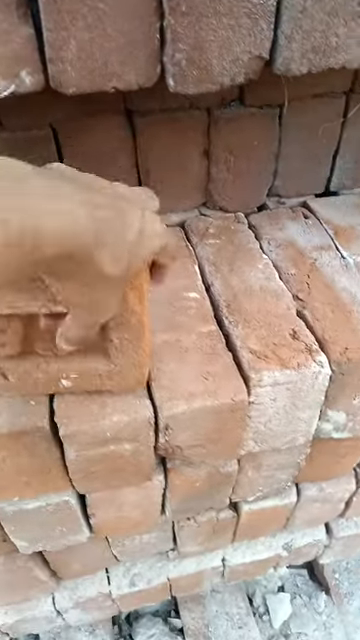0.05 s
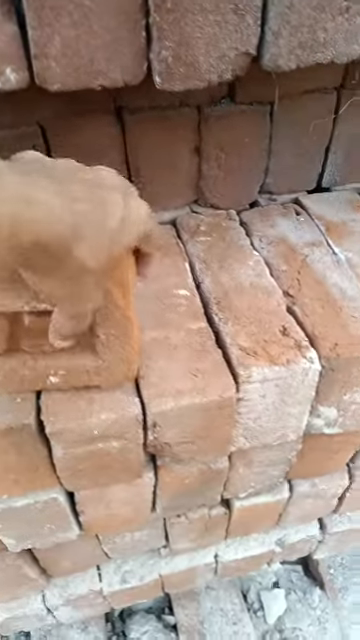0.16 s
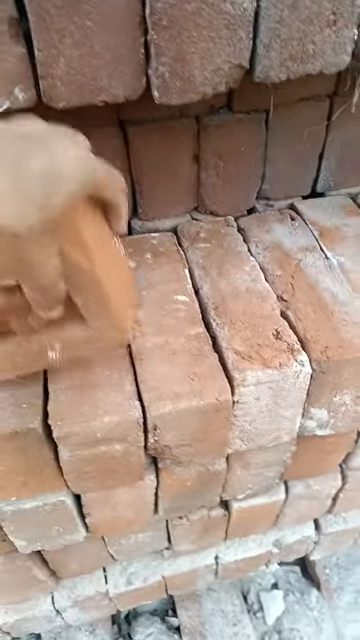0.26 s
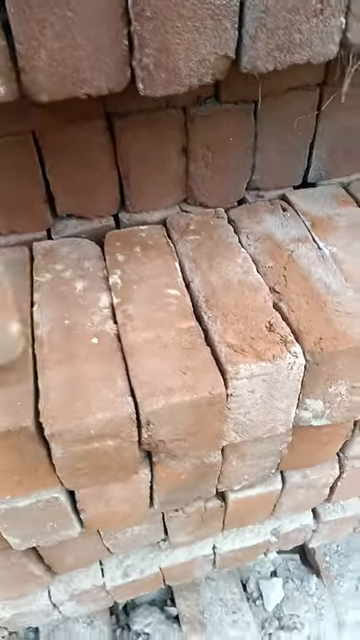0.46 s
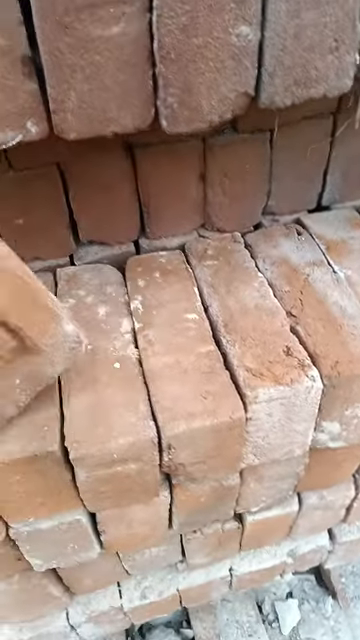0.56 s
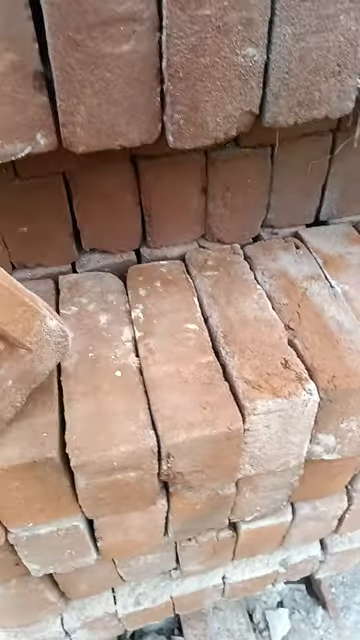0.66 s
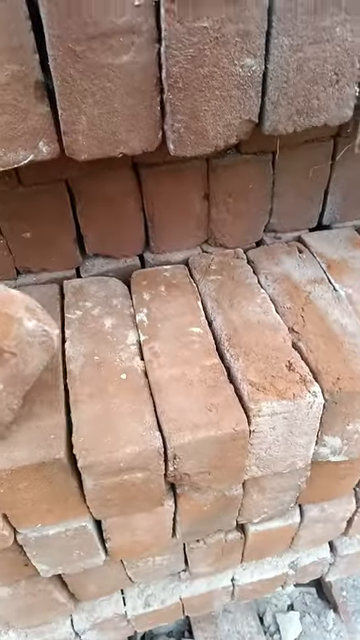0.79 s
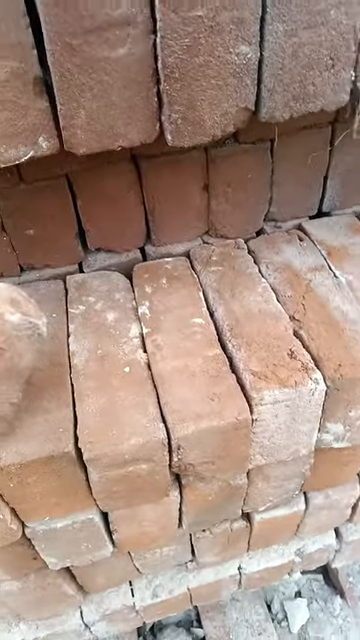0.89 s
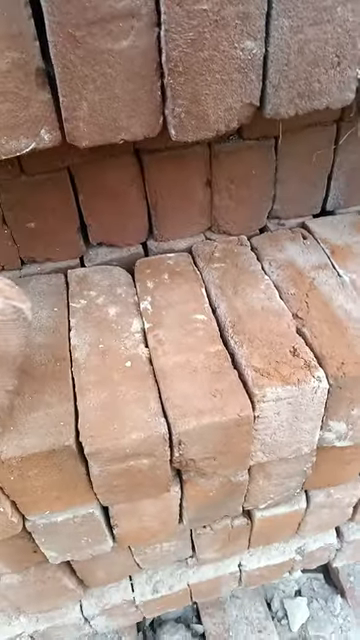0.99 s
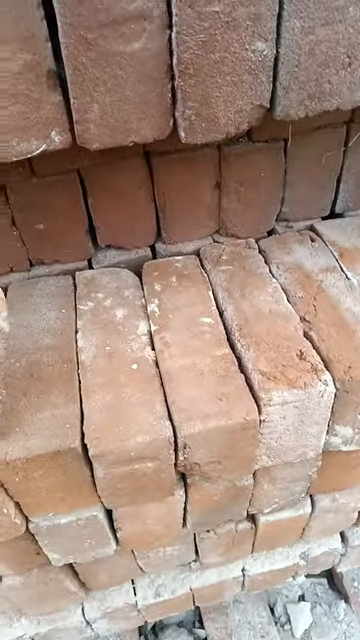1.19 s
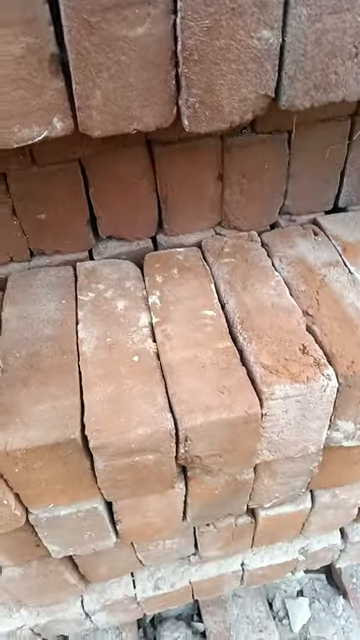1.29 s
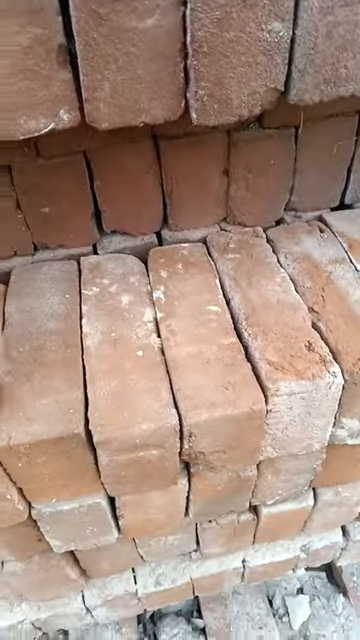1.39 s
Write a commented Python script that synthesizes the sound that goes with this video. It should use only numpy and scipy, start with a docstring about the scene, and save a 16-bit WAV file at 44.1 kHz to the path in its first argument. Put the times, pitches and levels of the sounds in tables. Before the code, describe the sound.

Gritty scraping and clinking knocks of a brick being slid, set down and nudged into place.

```python
"""A clay brick is dragged off a stack, knocks its neighbours, lands with a low thud and is nudged home.
Sliding friction breaks grit into a train of clicks that excites the brick's normal modes, and
stick-slip motion adds thin squeaks. Each impact rings the stack and crushes a little grit.
Brick piles close by return a short echo over a very quiet outdoor background."""
import sys
import numpy as np
from scipy import signal
from scipy.fft import rfft, irfft
from scipy.io import wavfile

SR = 44100
rng = np.random.default_rng(int(sys.argv[2]) if len(sys.argv) > 2 else 0)


def to_wav(s):
    """Save 16-bit WAV."""
    ch = np.atleast_2d(s).T  # columns
    pcm = np.round(np.clip(ch, -1, 1) * 32767)  # PCM
    wavfile.write(sys.argv[1], SR, pcm.astype(np.int16))


N = 63945
T = np.arange(N) / SR
JUDDER_HZ, JUDDER_DB = 260, 2.5  # rate and depth of the stick-slip flutter

# The drag across the stack. Each row: time in seconds, level in dB, treble gain in dB.
DRAG = [(0.09, -82, -29), (0.122, -39.5, -6), (0.16, -49, -23.5), (0.25, -25, -8.5), (0.282, -31, -1.5),
        (0.302, -22, 3.5), (0.346, -26, -1.5), (0.362, -15.5, 2.5), (0.382, -45, -16.5), (0.392, -30, 12.5),
        (0.408, -50, -22.5), (0.47, -50, -22.5), (0.53, -53.5, -16.5)]
# The brick catching on a neighbour before it lands. Each row: time in seconds, level in dB.
CATCH = [(0.529, -50), (0.535, -26), (0.541, -32), (0.545, -22.5), (0.548, -28), (0.552, -16.5),
         (0.559, -25), (0.566, -37), (0.58, -52)]
# The nudging into place. Each row: time in seconds, level in dB.
NUDGE = [(0.61, -38.5), (0.635, -38.5), (0.672, -44.5), (0.70, -40), (0.732, -57.5), (0.745, -40),
         (0.776, -47), (0.83, -55.5), (0.856, -46), (0.89, -46), (0.93, -57.5), (0.966, -71),
         (1.022, -44.5), (1.078, -56.5), (1.11, -31), (1.14, -47.5), (1.174, -31.5), (1.205, -44),
         (1.262, -49), (1.331, -50), (1.354, -29.5), (1.38, -45), (1.428, -45.5), (1.434, -50),
         (1.45, -32.5)]
# Modes of the brick, dragged and seated. Each row: frequency in Hz, relative level in dB, T60 in seconds.
DRAG_MODES = [(925, -8, .13), (1210, -8, .1), (1660, -7, .07), (2040, -6, .08), (2288, -2, .08),
              (2978, 0, .07), (3255, -2, .06), (3335, -6, .06), (3638, -1, .07), (3790, -4, .05),
              (3988, -1, .065), (4450, -5, .04), (5060, -5, .03), (5650, -4, .03), (5930, -2, .045),
              (6030, -3, .045), (6685, -5, .04), (6970, -2, .05), (7385, -1, .06), (8776, -4, .06)]
SEATED_MODES = [(930, -15, .06), (1240, -13, .06), (1740, -11, .08), (2012, 0, .15), (2078, -3, .11),
                (2305, -10, .09), (3118, -6, .05), (3335, -8, .05), (3680, -6, .04), (3980, -10, .03),
                (4450, -10, .03), (4850, -11, .04), (5730, -11, .06), (6330, -12, .04), (6590, -14, .04),
                (6980, -13, .04)]
# Spectrum of crunching grit. Each row: frequency in Hz, relative level in dB.
CRUNCH_SPECTRUM = [(1000, -15.5), (4500, -3.5), (6500, 5.5), (13000, -13), (15500, -17)]


def undb(db):
    """Amplitude ratio of a level in decibels."""
    return 10 ** (np.asarray(db) / 20)


def unit(x):
    """Normalisation to an rms of 1."""
    return x / np.sqrt(np.mean(x ** 2))


def curve(table, column=1):
    """Linear interpolation of a table column over time."""
    rows = np.array(table)
    return np.interp(T, rows[:, 0], rows[:, column])


def stroke(table):
    """Amplitude envelope of a movement, zero before and after it."""
    return undb(curve(table)) * (T >= table[0][0]) * (T <= table[-1][0])


def wander(rate):
    """Random modulation: Gaussian values, rate per second, joined by straight lines."""
    return np.interp(T * rate, np.arange(N // 10), rng.standard_normal(N // 10))


def tap(start):
    """An ideal impact: a unit impulse."""
    return signal.unit_impulse(N, int(start * SR))


def burst(start, decay, rise=.0007):
    """Transient envelope: exponential rise and decay, with time constants in seconds."""
    age = np.maximum(T - start, 0)
    return (1 - np.exp(-age / rise)) * np.exp(-age / decay)


def soften(x, hz, order=2):
    """Butterworth low-pass filtering."""
    return signal.sosfilt(signal.butter(order, hz, fs=SR, output="sos"), x)


def through(x, response):
    """Convolution with an impulse response scaled to unit energy."""
    return signal.fftconvolve(x, response / np.sqrt(np.sum(response ** 2)))[:N]


def colour(x, spectrum, size=4096):
    """Minimum-phase filtering to the shape of a spectrum."""
    hz, db = np.array(spectrum).T
    bin_hz = np.arange(size // 2 + 1) * SR / size
    log_gain = np.interp(np.log(bin_hz + 1), np.log(hz), np.log(undb(db)))
    cepstrum = irfft(log_gain)[:size // 2]
    cepstrum[1:] *= 2  # folding makes the response causal
    return through(x, irfft(np.exp(rfft(cepstrum, size))))


def ring(x, modes):
    """Modal superposition: x excites damped sinusoids of alternating sign, weighted by energy."""
    t = T[:N // 3]
    response = np.zeros_like(t)
    for k, (hz, db, t60) in enumerate(modes):
        amplitude = (-1) ** k * undb(db) / np.sqrt(t60)
        response += amplitude * np.exp(-np.log(1000) * t / t60) * np.sin(2 * np.pi * hz * t)
    return through(x, response)


def rubbed(x, modes):
    """Forced vibration under a moving contact: each mode swells, fades and detunes independently."""
    shift_hz, swell_db, detune = 45, 2, .004
    out, energy = np.zeros(N), 0
    for hz, db, t60 in modes:
        pole = np.exp(-np.log(1000) / (t60 * SR))
        pitch = hz * (1 + detune * wander(shift_hz))
        phasor = np.exp(2j * np.pi * np.cumsum(pitch) / SR)
        force = x * undb(swell_db * wander(shift_hz))
        swing = signal.lfilter([1], [1, -pole], force / phasor) * phasor
        out += undb(db) * np.sqrt(2 * (1 - pole ** 2)) * swing.imag
        out = -out  # successive modes alternate in sign
        energy += undb(db) ** 2
    return out / np.sqrt(energy)


def grit():
    """Shot noise of breaking grains: dense clicks, mostly small, modulated by stick and slip."""
    grains_per_s, spread_db = 5000, 2.7
    hit = rng.random(N) < grains_per_s / SR
    size = undb(spread_db * np.minimum(rng.exponential(size=N), 4))
    sign = rng.choice([-1, 1], N)
    return unit(hit * size * sign * undb(JUDDER_DB * wander(JUDDER_HZ)))


def air():
    """Stationary filtered noise: the faint outdoor background."""
    # Spectrum of the background. Each row: frequency in Hz, relative level in dB.
    spectrum = [(30, -12.5), (300, -13.5), (600, -3), (750, 0.5), (1200, -3.5), (2100, 0), (6000, -14.5),
                (12000, -19.5), (15000, -32)]
    return undb(-76) * colour(rng.standard_normal(N), spectrum)


def echo(x):
    """Scattering from the surrounding piles returns a short, dull tail."""
    delay_s, t60_s, cutoff_hz = 0.01, 0.15, 4500
    scatter = soften(rng.standard_normal(N), cutoff_hz, order=1)
    return undb(-22) * through(x, scatter * burst(delay_s, t60_s / np.log(1000)))


def rumble():
    """Low-frequency random vibration of the stack as the brick is worked in."""
    # Strength of the rumble. Each row: time in seconds, level in dB.
    levels = [(0.0, -84), (0.1, -84), (0.2, -70), (0.5, -73), (0.68, -61), (0.83, -73), (0.9, -66),
              (0.97, -81), (1.15, -71), (1.26, -65), (1.31, -77), (1.45, -73)]
    # Its spectrum. Each row: frequency in Hz, relative level in dB.
    spectrum = [(25, -27), (60, -10), (120, -1), (200, -10), (500, -10), (900, -15.5), (2000, -50.5)]
    return colour(rng.standard_normal(N), spectrum) * undb(curve(levels))


def crumbs():
    """Brittle fracture: single larger grains snap under the brick while it moves."""
    crumbs_per_s, spread_db, decay_s = 90, 4, .0004
    hit = rng.random(N) < crumbs_per_s / SR
    snaps = unit(hit * undb(spread_db * np.clip(rng.standard_normal(N), -2, 2)))
    chip = rng.standard_normal(N) * np.exp(-T / decay_s)
    dulling = undb(np.minimum(curve(DRAG, column=2), 0))
    effort = stroke(DRAG) * dulling + stroke(CATCH) + stroke(NUDGE) / 2
    return undb(-9) * colour(through(snaps * effort, chip), CRUNCH_SPECTRUM)


def squeaks():
    """Stick-slip oscillation: narrow, unsteady tones that swell and fade."""
    # Squeaks. Each row: start and length in seconds, first and last frequency in Hz, level in dB.
    tones = [(0.109, 0.086, 1350, 1275, -46), (0.159, 0.03, 2560, 2540, -43.5),
             (0.19, 0.067, 2325, 2196, -35.5), (0.225, 0.022, 3310, 3340, -29.5),
             (0.458, 0.08, 1185, 1255, -45), (0.964, 0.51, 826, 745, -61.5),
             (1.094, 0.147, 2020, 2008, -33)]
    out = np.zeros(N)
    for start, length, first_hz, last_hz, db in tones:
        along = np.clip((T - start) / length, 0, 1)
        waver = 1 + 0.015 * unit(soften(rng.standard_normal(N), hz=80))
        pitch = (first_hz + (last_hz - first_hz) * along) * waver
        flutter = undb(JUDDER_DB * wander(JUDDER_HZ))
        swell = 2 * np.sqrt(along * (1 - along))
        out += undb(db) * flutter * swell * np.sin(2 * np.pi * np.cumsum(pitch) / SR)
    return out


def slips():
    """Transient excitation: each jerk against the neighbours crunches grit and rings the brick afresh."""
    # Jerks. Each row: start in seconds, crunch level in dB, impulse level in dB.
    jerks = [(0.532, -40, -2), (0.551, -28, -4), (0.685, -53, -15), (0.773, -47, -26), (1.016, -42, -16),
             (1.096, -40, -11), (1.153, -46, -13), (1.169, -39, -7), (1.223, -45, -15), (1.339, -36, -17),
             (1.354, -42, -8)]
    crunch = sum(undb(db) * burst(start, decay=.009, rise=.004) for start, db, _ in jerks)
    push = sum(undb(db) * tap(start) for start, _, db in jerks)
    return colour(crunch * grit(), CRUNCH_SPECTRUM) + ring(soften(push, hz=2600), SEATED_MODES)


def rub(movement, spectrum, modes, grit_db, ring_db):
    """Friction noise: grit is heard directly and through the modes that it drives."""
    grains = grit() * stroke(movement)
    return undb(grit_db) * colour(grains, spectrum) + undb(ring_db) * rubbed(grains, modes)


def nudge():
    """Light sliding friction as the seated brick is pushed into place."""
    # Spectrum of the grit beneath it. Each row: frequency in Hz, relative level in dB.
    spectrum = [(100, -17), (300, -16.5), (600, -11), (1000, -1.5), (1500, -8.5), (2100, 14.5), (2600, 0),
                (3500, 1.5), (6500, -13.5), (9500, -2), (11500, -17), (13800, -17), (15000, -3)]
    return rub(NUDGE, spectrum, SEATED_MODES, grit_db=-5.5, ring_db=-1.5)


def catch():
    """Brief sliding friction as the brick catches on its neighbour."""
    # Spectrum of the scrape. Each row: frequency in Hz, relative level in dB.
    spectrum = [(100, -31.5), (280, 4), (600, -5), (950, 12.5), (1250, -5), (1600, 5.5), (2600, -11.5),
                (3200, 13.5), (4700, 7.5), (5400, -1.5), (6900, -16), (9000, -12.5), (9850, 5),
                (11200, -30), (15200, -10.5)]
    return rub(CATCH, spectrum, SEATED_MODES, grit_db=-1, ring_db=-10)


def thud():
    """Damped low oscillation of the whole pile as the brick's full weight lands."""
    # The landing: start in seconds, frequency in Hz, level in dB, decay time in seconds.
    landing = (0.599, 120, -31, .022)
    start, hz, db, decay = landing
    return undb(db) * burst(start, decay) * np.sin(2 * np.pi * hz * (T - start))


def clink():
    """Impulse response: a hard corner strikes and rings the brick's middle modes like pottery."""
    # The corner's strike. Each row: start in seconds, impulse level in dB.
    strikes = [(0.4165, 1.5)]
    # Spectrum of the contact force. Each row: frequency in Hz, relative level in dB.
    spectrum = [(2300, -16), (2950, -3), (3250, 2), (3600, -15), (5100, -2), (7000, -18)]
    push = sum(undb(db) * tap(start) for start, db in strikes)
    return ring(colour(push, spectrum), DRAG_MODES)


def clunk(start, hz):
    """Contact resonance: the brick bounces for a few cycles, sinking in pitch as the load eases."""
    decay_s, sag = 0.0042, 0.08
    age = np.maximum(T - start, 0)
    pitch = hz * (1 - sag * (1 - np.exp(-age / (2 * decay_s))))
    return burst(start, decay_s) * np.sin(2 * np.pi * np.cumsum(pitch * (age > 0)) / SR)


def knocks():
    """Impact excitation: each blow clunks, rings the stack, rattles loose bricks and crushes grit."""
    # Blows. Each row: start in seconds, clunk frequency in Hz, drive levels in dB of clunk, stack,
    # rattle and crack, decay time of the crack in seconds.
    blows = [(0.2448, 961, -21.5, -20.5, -31, -23.5, 0.0045), (0.2485, 269, -20.5, -45, -36, -24, 0.0051),
             (0.4153, 944, -15.5, -13.5, -28, -10.5, 0.0059), (0.4251, 507, -20.5, -7, -30.5, -36, 0.0031),
             (0.5952, 759, -8.5, -7, -25, -16.5, 0.0058), (0.5988, 709, -3, -0.5, -19.5, -33.5, 0.024),
             (0.738, 990, -39, -45, -50, -39.5, 0.014), (1.171, 1254, -32, -59, -52, -40.5, 0.0048),
             (1.43, 1750, -38.5, -52.5, -71, -56, 0.0053)]
    # Modes of the stack. Each row: frequency in Hz, relative level in dB, T60 in seconds.
    stack_modes = [(215, -16, .12), (270, -11, .1), (363, -13, .07), (493, 3, .06), (660, -5, .05),
                   (724, -2, .06), (845, -7, .055), (920, -5, .12), (1195, -6, .09)]
    # Spectra of loose bricks and of crushed grit. Each row: frequency in Hz, relative level in dB.
    rattle_spectrum = [(30, -46), (70, -22), (110, -9), (180, -8), (270, -1), (400, -1), (500, 2),
                       (600, -1), (850, 2), (1300, -4), (2500, -25), (8000, -50)]
    crack_spectrum = [(200, -35), (900, 6.5), (1700, 2), (3200, 2), (5000, -5), (8000, -4), (11500, -11.5),
                      (13500, -11.5), (15200, -7)]
    clunks, push, rattle, crack = np.zeros((4, N))
    for start, clunk_hz, clunk_db, stack_db, rattle_db, crack_db, crack_decay in blows:
        clunks += undb(clunk_db) * clunk(start, clunk_hz)
        push += undb(stack_db) * tap(start)
        rattle += undb(rattle_db) * burst(start, decay=0.014)
        crack += undb(crack_db) * burst(start, crack_decay)
    crack *= grit()
    stack = 2 * ring(soften(push, hz=1570), stack_modes)
    body = clunks + stack + colour(rattle * grit(), rattle_spectrum)
    return body + colour(crack, crack_spectrum) + undb(-12) * ring(crack, DRAG_MODES)


def drag():
    """Sliding friction: grit under the dragged brick hisses and rings it, brighter as it bites."""
    # Spectrum of the sliding grit. Each row: frequency in Hz, relative level in dB.
    spectrum = [(100, -25), (450, -11), (1000, 2.5), (1450, -1), (3500, 6.5), (5000, 1), (7000, 2.5),
                (9500, 5.5), (11300, -8), (12500, -0.5), (13000, -7), (13900, -5.5), (14600, 2.5),
                (16000, -3.5)]
    crossover_hz = 4700
    scrape = rub(DRAG, spectrum, DRAG_MODES, grit_db=-3, ring_db=-3)
    low = soften(soften(scrape, crossover_hz)[::-1], crossover_hz)[::-1]  # both ways: zero phase
    return low + (scrape - low) * undb(curve(DRAG, column=2))


def scene():
    """Superposition of the bricks, their echo and the background, in one channel."""
    bricks = catch() + nudge() + rumble() + drag() + squeaks()
    bricks += knocks() + clink() + thud() + slips() + crumbs()
    return (bricks + echo(bricks) + air())[None]


def record(dry):
    """Band limiting: a high-pass thins the deep bass and a steep low-pass cuts the top."""
    low_cut_hz, top_hz = 62, 15750
    thin = signal.sosfilt(signal.butter(3, low_cut_hz, "high", fs=SR, output="sos"), dry)
    return signal.sosfilt(signal.ellip(10, .2, 80, top_hz, fs=SR, output="sos"), thin)


dry = scene()
out = record(dry)
to_wav(out)
```